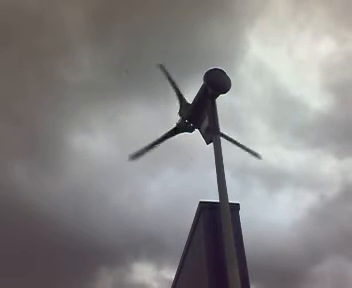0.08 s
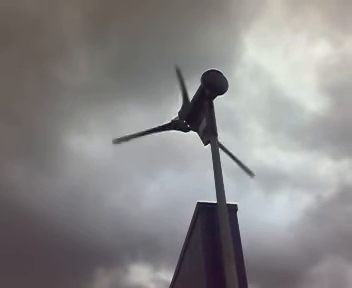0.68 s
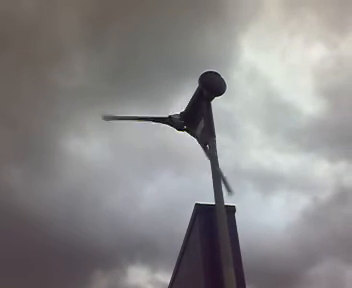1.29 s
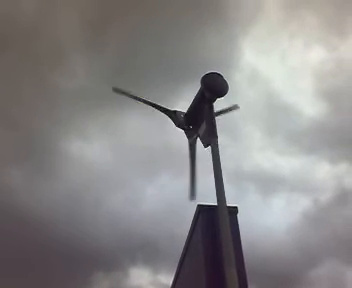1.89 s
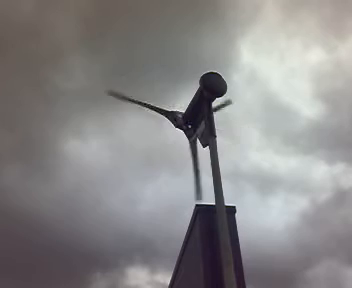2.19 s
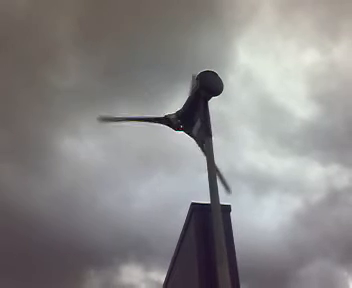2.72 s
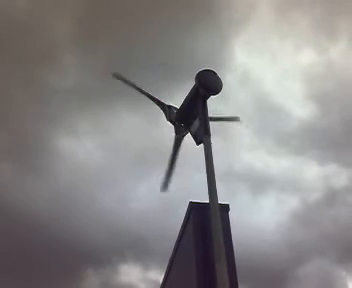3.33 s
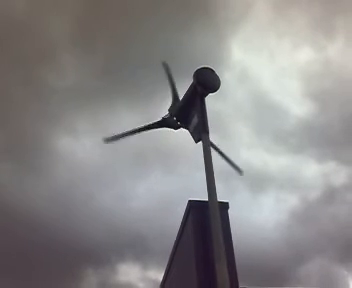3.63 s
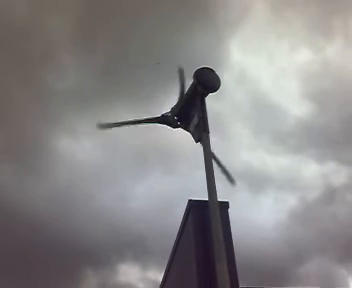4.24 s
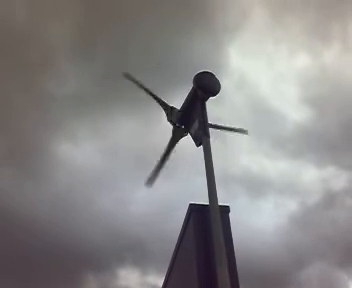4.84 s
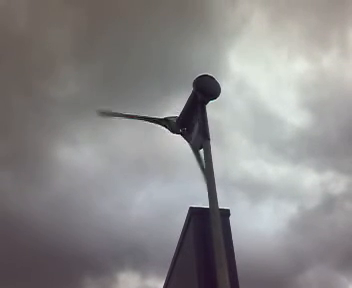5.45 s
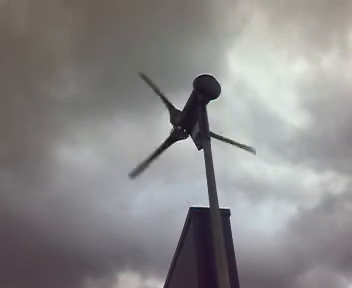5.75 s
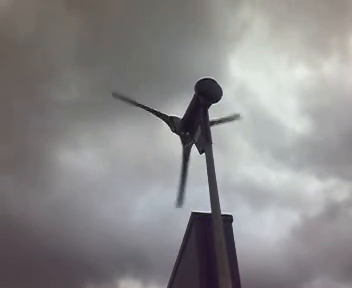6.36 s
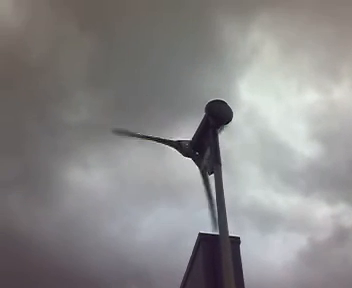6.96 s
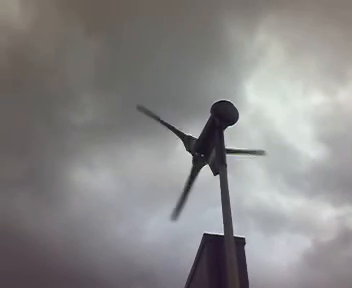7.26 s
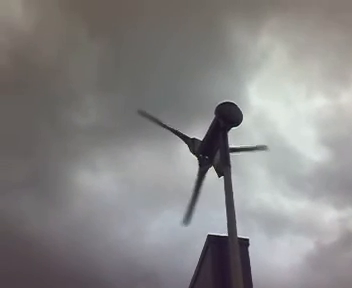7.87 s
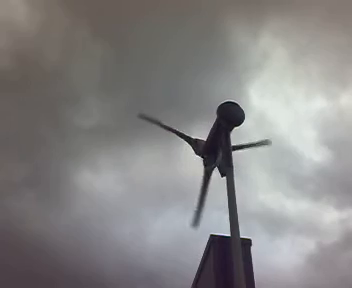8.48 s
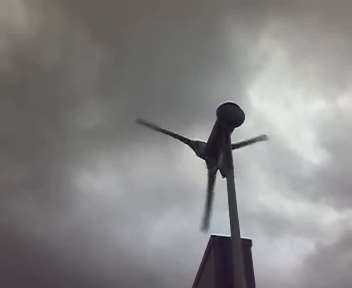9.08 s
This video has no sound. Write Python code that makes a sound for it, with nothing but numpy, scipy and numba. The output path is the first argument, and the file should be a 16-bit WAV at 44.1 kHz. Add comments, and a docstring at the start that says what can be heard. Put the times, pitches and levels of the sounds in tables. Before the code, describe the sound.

Outdoors, tyres roar steadily on a road some way off, with a low drone of far engines and a faint hiss of leaves. At about 1 second, strong gusts hit the microphone with low rumbling and sharp, ragged slaps, peaking near 1.5 seconds and easing by 2. The stronger gusts reach higher in pitch. One tiny dry tick, nearly buried in the wind, comes at 2.5 seconds. Weaker gusts and puffs continue until about 5 seconds, when strong buffeting returns and lasts to around 6.5 seconds. The wind on the microphone then drops to a light rumble. The road, which has slowly grown louder, carries on with its hollow roar and engine hum, while the leaves swell softly twice, near 7.7 and 8.6 seconds, before the sound ends just after 9 seconds.

```python
"""A windy day. From the start, tyres roar on a road some way off, far engines drone and leaves hiss.
At about 1 second, gusts buffet and slap the microphone, the stronger ones reaching higher in pitch.
A faint tick comes at 2.5 seconds, weaker gusts follow, and strong ones return from 5 to 6.5 seconds.
Then the buffeting dies down, leaving a louder road and two swells of wind in the leaves.
At the very end a thin whistle of air only just begins to fade in."""
import sys
import numpy as np
from scipy import signal
from scipy.fft import rfft, irfft, next_fast_len
from scipy.io import wavfile
from numba import njit

SR = 44100
rng = np.random.default_rng(int(sys.argv[2]) if len(sys.argv) > 2 else 0)


def pcm_store(signal):
    """Save signal as 16-bit PCM."""
    levels = np.round(np.clip(np.atleast_2d(signal), -1, 1) * 32767)
    wavfile.write(sys.argv[1], SR, levels.astype(np.int16).T)


N = 407043

# Long gusts. Each row: time of full strength, then rise, hold and fall, all in seconds, relative dB.
GUSTS = [(1.153, 0.71, .22, .12, -25.5), (1.502, .08, .36, 0.14, -22.5), (2.12, .1, .08, 0.25, -31),
         (2.8, 0.092, 0.43, .15, -32.5), (3.782, .16, .82, 0.14, -30.5), (4.922, .04, .03, .04, -28.5),
         (5.055, 0.11, .32, .1, -24.5), (5.603, .25, .22, .17, -21.5), (6.194, 0.23, .08, 0.18, -23)]
# Short puffs on top of the gusts. Each row: time of full strength and hold in seconds, relative dB.
PUFFS = [(1.032, 0.14, -27), (1.198, .079, -22), (1.467, 0.02, -16.5), (1.545, 0.053, -17),
         (1.637, .025, -20.5), (1.718, 0.05, -20.5), (1.871, .05, -30), (2.153, 0.013, -31.5),
         (2.763, .06, -32.5), (3.22, 0.067, -32), (3.915, 0.03, -27.5), (4.12, .092, -26.5),
         (4.435, .06, -25.5), (4.893, .05, -24), (5.101, .05, -24.5), (5.575, 0.088, -22.5),
         (5.82, 0.045, -29), (5.918, 0.017, -21), (6.182, 0.02, -25), (6.227, 0.044, -18.5)]
# Sharp swirls of air. Each row: time in seconds, relative peak level in dB, pitch in Hz.
SLAPS = [(0.926, -11, 185), (1.034, -7, 150), (1.101, -4, 164), (1.227, -7, 140), (1.247, -17, 80),
         (1.274, -5.5, 390), (1.382, -14, 130), (1.462, -4, 160), (1.47, -6, 400), (1.485, -11.5, 330),
         (1.534, -6, 230), (1.533, -10, 480), (1.553, -1, 390), (1.555, -10, 90), (1.586, -13, 260),
         (1.594, -7, 170), (1.645, -8, 290), (1.733, -8, 180), (1.744, -9, 220), (1.783, -7, 500),
         (1.802, -6.5, 166), (1.876, -10.5, 110), (1.898, -12, 189), (1.918, -21, 90), (1.954, -15, 100),
         (2.156, -10.5, 161), (2.721, -16.5, 130), (4.138, -12.5, 110), (4.205, -8.5, 125),
         (4.455, -14, 171), (4.92, -13, 160), (4.949, -15, 170), (5.059, -11.5, 192), (5.125, -11, 85),
         (5.158, -13, 95), (5.423, -10, 144), (5.512, -9, 120), (5.566, -5, 230), (5.599, -12, 340),
         (5.635, -11, 400), (5.641, -9, 101), (5.672, -11, 300), (5.717, -4, 243), (5.823, -7, 110),
         (5.852, -7, 166), (5.928, -7.5, 308), (5.939, -10.5, 119), (6.003, -8.5, 141),
         (6.072, -10.5, 85.4), (6.225, -2.5, 157), (6.228, -11, 420), (6.251, -8, 340), (6.263, -13, 55),
         (6.286, -14, 58), (6.366, -17, 90)]
# How loud the road is. Each row: time in seconds, relative roar level in dB, tread hiss level in dB.
ROAD_LEVELS = [(0.0, -30.5, -39.5), (1.3, -31, -40), (2.2, -30, -42), (3.05, -30.5, -41.5),
               (3.45, -29.5, -38), (3.72, -28.5, -35.5), (4.1, -27.5, -35.5), (4.53, -28, -36.5),
               (4.9, -28.5, -40.5), (5.47, -29.5, -39.5), (5.69, -27.5, -37.5), (6.1, -28.5, -38.5),
               (6.45, -25, -32.5), (6.65, -26.5, -37.5), (6.97, -26.5, -34.5), (7.25, -26, -37.5),
               (7.55, -27, -36.5), (8.1, -26, -35.5), (8.5, -26.5, -36.5), (9.17, -26, -35.5)]
# The hollow ring in the roar. Each row: time in seconds, centre pitch in Hz.
ROAR_RING = [(0.45, 1115), (1.6, 1190), (1.95, 1430), (3.4, 1470), (3.8, 1170), (5.3, 1125), (5.75, 1344),
             (6.4, 1090), (7.0, 1186), (7.7, 1060), (8.7, 1160)]
# Far engines. Each row: time of full strength and hold in seconds, first and last firing rate in Hz,
# level in dB.
ENGINES = [(0.305, 3.1, 65.6, 59.9, -38.5), (2.758, 0.95, 96.5, 100.2, -41), (4.1, 0.63, 68.1, 67, -32.5),
           (5.084, 2.18, 75.2, 69.46, -32), (7.347, 0.3, 63.3, 61, -37), (7.97, 0.23, 60.5, 60, -32),
           (8.45, 0.62, 59.6, 58, -35)]
# Swells of wind in the leaves. Each row: time of the peak and width in seconds, relative level in dB.
LEAF_SWELLS = [(0.1, 0.33, -53.5), (1.05, 0.25, -52), (1.68, 0.45, -50), (4.5, 0.58, -48.5),
               (5.7, 0.99, -51.5), (6.9, 0.55, -50.5), (7.65, 0.48, -45), (8.58, 0.67, -46)]
# The whistle. One row: time of full strength (past the end) and hold in seconds, first and last pitch
# in Hz, full level in dB.
WHISTLE = (9.5, .46, 6290, 6370, -50.5)
# The tone colour of each noise, from low to high. Each row: frequency in Hz, relative level in dB.
BUFFET_COLOUR = [(10, -4), (28, -1.5), (45, 0.5), (80, 1), (130, -1), (190, -5.5), (310, -7), (600, -6.5),
                 (1500, 2)]
ROAR_COLOUR = [(200, -5), (260, -4), (400, -6.5), (550, -5), (800, -2.5), (1100, -1.5), (1380, -2.8),
               (1740, -3.5), (2050, -8), (2600, -16.5), (3500, -31.5)]
TREAD_COLOUR = [(1200, -7.5), (1800, 3), (2300, 2.5), (3000, -0.5), (3600, -1.5), (4000, -2), (4500, -6.5),
                (5200, -7), (5800, -14), (7500, -40)]
RUMBLE_COLOUR = [(15, -3), (30, -7.5), (42, -2.5), (58, 2.5), (78, 4), (100, -6), (132, -2.5), (175, -5),
                 (260, -2.4), (400, -10.5), (700, -23)]
LEAF_COLOUR = [(2500, -13), (4000, 2.5), (5200, 5), (5800, 3), (6400, 3), (7300, -3.5), (7900, -19.5)]


def buffet(db_per_octave=14, burst_db=1.54, gain_db=1.0):
    """Air swirls at the microphone: faster air makes the swirls stronger, smaller and so higher."""
    gust_db = wind_pressure_db()
    cutoff_hz = np.clip(310 * 2 ** ((gust_db + 18.5) / db_per_octave), 60, 900)
    swirls = noise(BUFFET_COLOUR) * undb(burst_db * wander(39))
    flow = lowpass(swirls, cutoff_hz, damping=0.66)
    flow = lowpass(flow, 2.6 * cutoff_hz, damping=1.42)
    # the largest, slowest swirls thin out as the air speeds up
    flow = flow - 0.55 * lowpass(flow, 0.06 * cutoff_hz, damping=3.2)
    return unit(flow) * undb(gust_db + gain_db)


def wind_pressure_db(calm_db=-38.5):
    """How hard the wind pushes on the microphone: light air, gusts and puffs add their power."""
    gusts = sum((undb(db) * envelope(s, hold, rise, fall)) ** 2 for s, rise, hold, fall, db in GUSTS)
    puffs = sum((undb(db) * envelope(s, hold, rise=0.017, fall=0.027)) ** 2 for s, hold, db in PUFFS)
    return 10 * np.log10(undb(calm_db) ** 2 + gusts + puffs)


def slaps(raggedness=0.3, gain_db=-2):
    """Each sharp swirl hits the microphone as one quick swing of pressure with ragged edges."""
    swings = sum(blip(s, db + gain_db, hz, cycles=0.59) for s, db, hz in SLAPS)
    return swings * (1 + raggedness * wander(250))


def road(roar_gain_db=1.77, rumble_db=-33):
    """Many far tyres: a roar with a drifting hollow ring, tread hiss above it and a rumble below."""
    roar_db, tread_db = curves(ROAD_LEVELS)
    ring_hz, = curves(ROAR_RING)
    roar = restless_noise(ROAR_COLOUR, rate=4.4, flicker_db=0.5)
    roar = resonate(roar, ring_hz, width=0.36, boost_db=1.5) * undb(roar_db + roar_gain_db)
    tread = restless_noise(TREAD_COLOUR, rate=1.7, flicker_db=2.0) * undb(tread_db)
    # the bass carries from further off, so it swells less than the roar
    swell_db = 0.83 * (roar_db - roar_db.mean())
    rumble = noise(RUMBLE_COLOUR) * undb(rumble_db + swell_db)
    return roar + tread + rumble


def engine(start, hold, first_hz, last_hz, db, waver=0.0099, octave_db=-13.5, fade_s=0.13):
    """Only the two lowest firing tones of a far engine reach us, wavering in the wind."""
    firing_hz, = curves([(start, first_hz), (start + hold, last_hz)])
    phase = 2 * np.pi * np.cumsum(firing_hz * (1 + waver * wander(11))) / SR
    tone = np.sin(phase) + undb(octave_db) * np.sin(2 * phase)
    return unit(tone) * undb(db) * envelope(start, hold, fade_s, fade_s)


def leaves(calm_db=-56, flutter_db=0.73, gain_db=4.0):
    """Leaves hiss louder in each swell of wind, fluttering quickly."""
    swells = sum((undb(db) * envelope(s, 0, width, width)) ** 2 for s, width, db in LEAF_SWELLS)
    stir = np.sqrt(undb(calm_db) ** 2 + swells)
    hiss = restless_noise(LEAF_COLOUR, rate=8.0, flicker_db=1.04)
    return hiss * stir * undb(gain_db + flutter_db * wander(60))


def tick(time_s=2.4934, cycles=3.7):
    """One dry tick made of two very short high tones, nearly buried in the wind."""
    return blip(time_s, db=-30, hz=4950, cycles=cycles) + blip(time_s, db=-38, hz=7000, cycles=cycles)


def whistle(start, hold, first_hz, last_hz, db, width_hz=100, fade_s=0.13):
    """Air sings faintly over an edge: a narrow band of hiss around one pitch."""
    hz, = curves([(start, first_hz), (start + hold, last_hz)])
    phase = 2 * np.pi * np.cumsum(hz) / SR
    hiss = wander(width_hz) * np.sin(phase) + wander(width_hz) * np.cos(phase)
    return unit(hiss) * undb(db) * envelope(start, hold, fade_s, fade_s)


def undb(db):
    """Turns decibels into a number to multiply by."""
    return 10 ** (np.asarray(db) / 20)


def unit(x):
    """Scales a signal so its average strength (rms) is 1."""
    return x / np.sqrt(np.mean(x ** 2))


def curves(table):
    """Joins each column's values with straight lines; the first column gives the times."""
    times, *columns = np.transpose(table)
    return [np.interp(np.arange(N) / SR, times, column) for column in columns]


def envelope(start, hold, rise, fall):
    """A loudness shape that rises to reach 1 at start, holds, then dies away; all in seconds."""
    age = np.arange(N) / SR - start
    return np.exp(-(np.minimum(age, 0) / rise) ** 2 - (np.maximum(age - hold, 0) / fall) ** 2)


def blip(time_s, db, hz, cycles):
    """A very short swing of pressure: a tone under a bell-shaped fade."""
    age = np.arange(N) / SR - time_s
    near, out = np.abs(age) < 0.05, np.zeros(N)
    fade = np.exp(-(age[near] * hz / cycles) ** 2)
    out[near] = undb(db) * fade * np.sin(2 * np.pi * hz * age[near] + rng.uniform(0, 2 * np.pi))
    return out


def wander(rate):
    """A smooth random wobble of strength 1 that changes about rate times a second."""
    size = next_fast_len(N, True)
    freqs = np.arange(size // 2 + 1) * SR / size
    spectrum = rfft(rng.standard_normal(size)) * np.exp(-(freqs / rate) ** 2)
    return unit(irfft(spectrum, size)[:N])


def noise(colour):
    """Noise of strength 1 with the given tone colour, falling away steeply past the table's ends."""
    hz, db = np.transpose(colour)
    freqs = np.arange(1, N // 2 + 2) * SR / N
    shape = undb(np.interp(np.log(freqs), np.log(hz), db))
    edges = np.minimum(1, np.minimum(freqs / hz[0], hz[-1] / freqs)) ** 2
    return unit(irfft(rfft(rng.standard_normal(N)) * shape * edges, N))


def restless_noise(colour, rate, flicker_db, band_count=6):
    """Noise split into bands from low to high, each swelling and fading on its own."""
    spectrum = rfft(noise(colour))
    log_freqs = np.log(np.arange(1, N // 2 + 2) * SR / N)
    centres = np.linspace(np.log(colour[0][0]), np.log(colour[-1][0]), band_count)
    bands = (irfft(spectrum * np.interp(log_freqs, centres, pick), N) for pick in np.eye(band_count))
    return unit(sum(band * undb(flicker_db * wander(rate)) for band in bands))


@njit
def lowpass(x, hz, damping):
    """Keeps the sound below a moving cutoff; less damping makes it ring more there."""
    out, band, low = np.empty(len(x)), 0., 0.
    for i in range(len(x)):
        step = np.tan(np.pi * hz[i] / SR)
        slope = (band + step * (x[i] - low)) / (1 + step * (step + damping))
        out[i] = low + step * slope
        band, low = 2 * slope - band, 2 * out[i] - low
    return out


def resonate(x, hz, width, boost_db):
    """Lifts a band around a moving pitch; width is a fraction of that pitch."""
    band = width * np.gradient(lowpass(x, hz, width)) * SR / (2 * np.pi * hz)
    return unit(x + (undb(boost_db) - 1) * band)


def scene():
    """Wind, traffic and the small background sounds meet at one microphone."""
    traffic = road() + sum(engine(*row) for row in ENGINES)
    return (buffet() + slaps() + traffic + leaves() + tick() + whistle(*WHISTLE))[None]


def record(dry):
    """The recorder rounds off the strongest gusts and cuts the highest treble."""
    drive, top_hz = 0.81, 7500
    rounded = np.tanh(drive * dry) / drive
    treble_cut = signal.ellip(12, 0.2, 80, top_hz, fs=SR, output="sos")
    return signal.sosfilt(treble_cut, rounded)


dry = scene()
out = record(dry)
pcm_store(out)
```